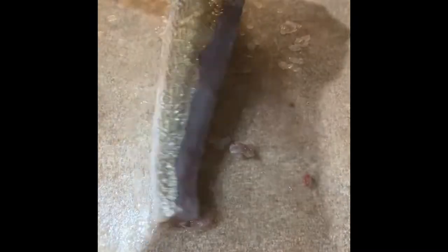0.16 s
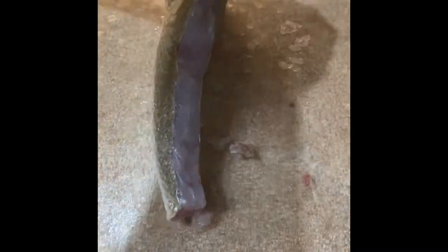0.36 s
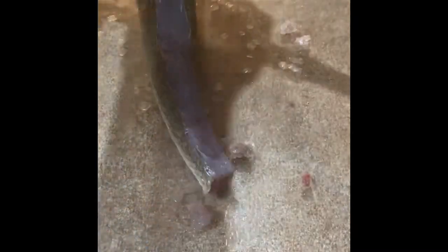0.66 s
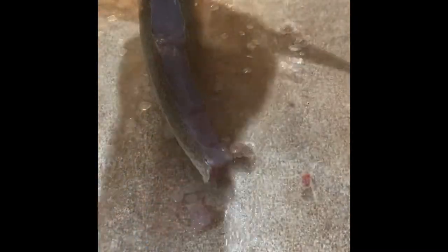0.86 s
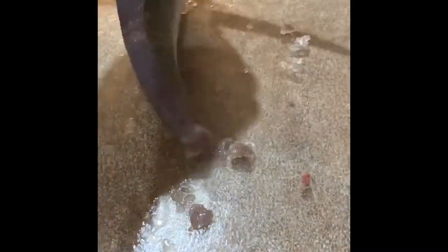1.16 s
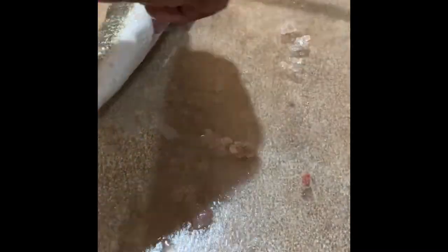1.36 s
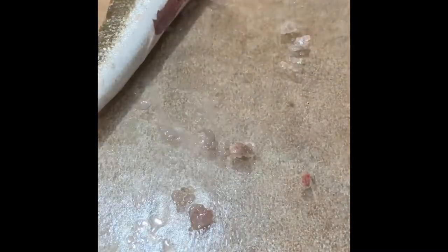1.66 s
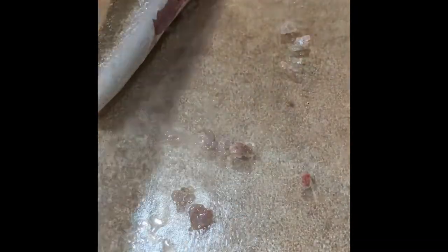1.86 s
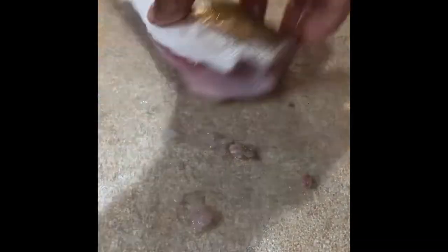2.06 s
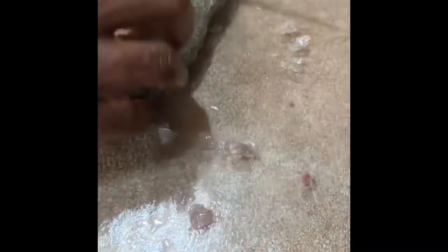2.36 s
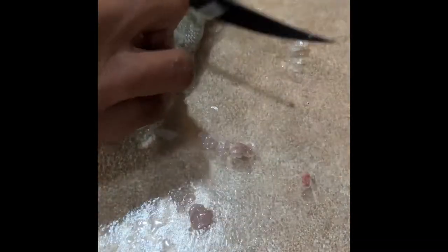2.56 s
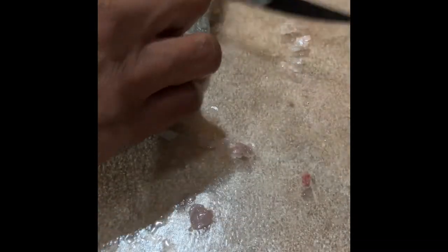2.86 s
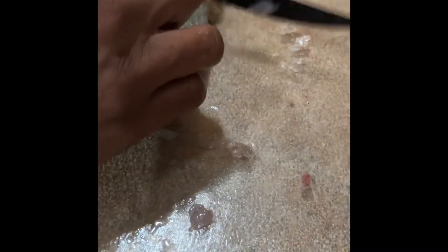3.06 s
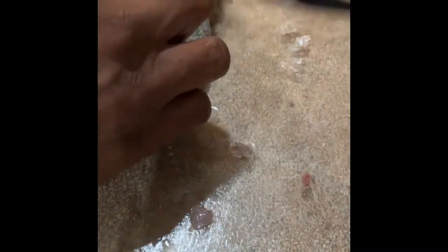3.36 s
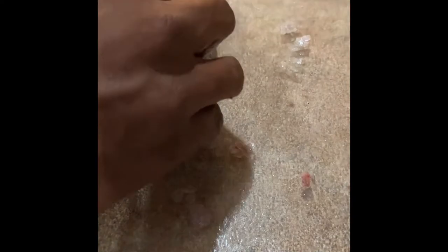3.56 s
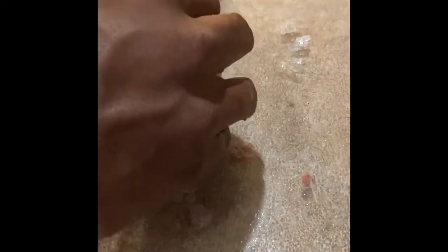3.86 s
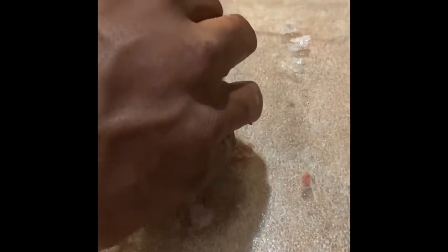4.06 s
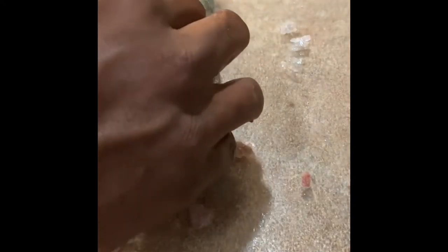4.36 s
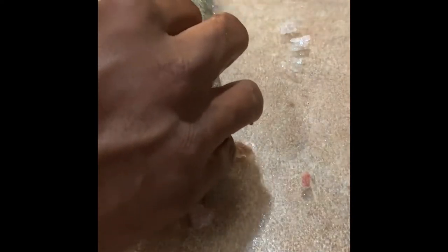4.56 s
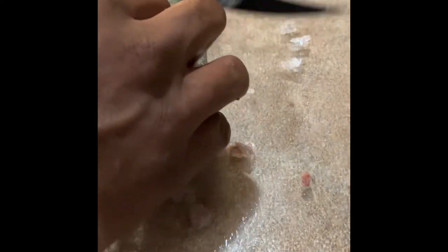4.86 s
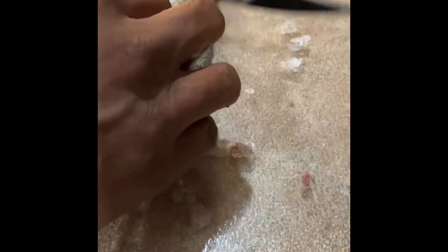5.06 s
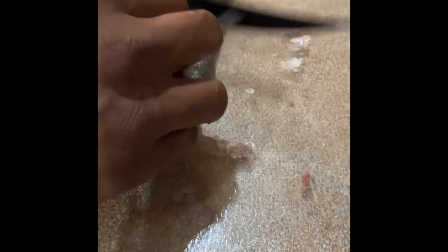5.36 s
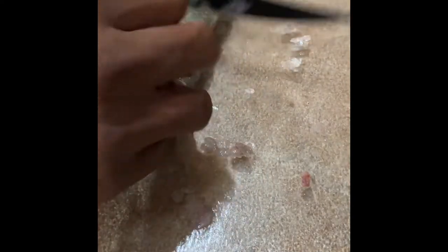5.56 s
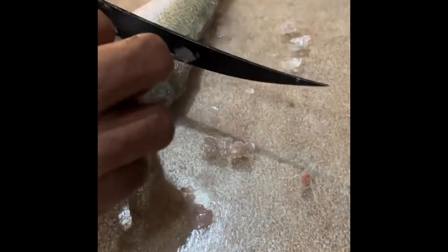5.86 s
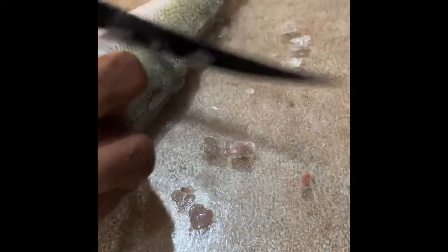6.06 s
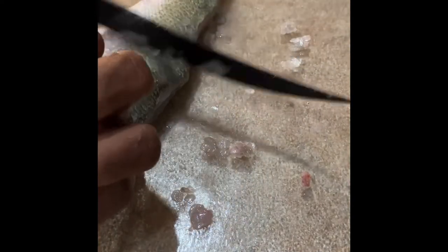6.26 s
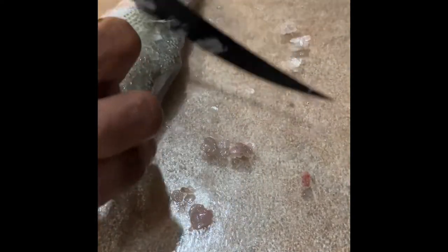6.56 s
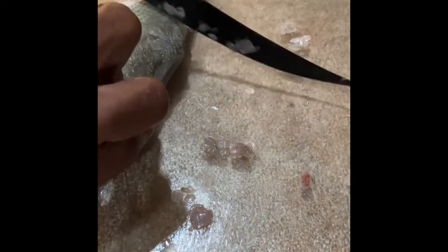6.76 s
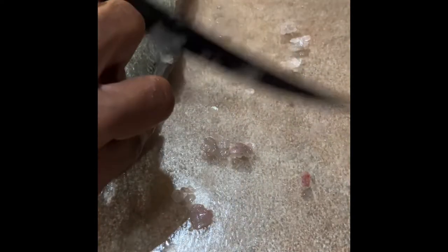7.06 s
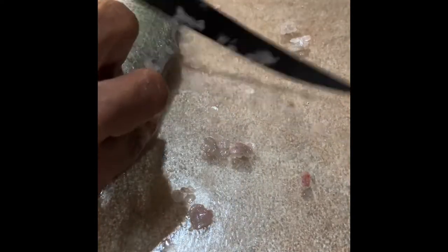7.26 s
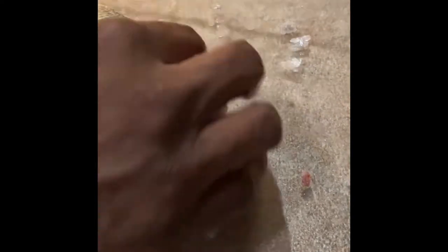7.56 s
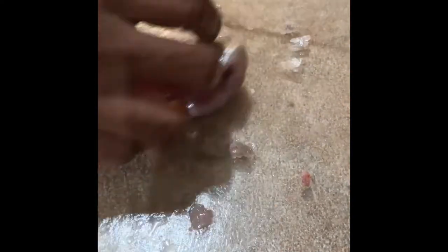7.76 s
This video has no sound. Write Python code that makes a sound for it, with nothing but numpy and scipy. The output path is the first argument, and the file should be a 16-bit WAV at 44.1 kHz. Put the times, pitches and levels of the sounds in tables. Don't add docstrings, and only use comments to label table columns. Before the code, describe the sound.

Quick knife strokes scrape scales off a wet fish on a stone counter, each thumping low, then the blade chatters on stone.

```python
import sys
import numpy as np
from scipy import signal
from scipy.fft import rfft, irfft, next_fast_len
from scipy.io import wavfile
from scipy.ndimage import uniform_filter1d

SR = 44100
rng = np.random.default_rng(int(sys.argv[2]) if len(sys.argv) > 2 else 0)


def rack_gain(trim_db):
    fader = np.asarray(trim_db, float)
    return 10 ** (fader / 20)


def to_wav(s):
    ch = np.atleast_2d(s).T
    pcm = np.round(np.clip(ch, -1, 1) * 32767)
    wavfile.write(sys.argv[1], SR, pcm.astype(np.int16))


N = 348831
TIME = np.arange(N) / SR


def evened(x):
    return x / np.sqrt(np.mean(x ** 2) + 1e-20)


def read(points, hz):
    f, value = np.transpose(points)
    return np.interp(np.log(hz + 1), np.log(f + 1), value)


def over_time(points):
    return np.interp(TIME, *np.transpose(points))


def add(mix, s, sound):
    part = mix[..., round(s * SR):][..., :sound.shape[-1]]
    part += sound[..., :part.shape[-1]]


def coloured(x, points):
    size = next_fast_len(x.shape[-1])
    gain = rack_gain(read(points, np.fft.rfftfreq(size, 1 / SR)))
    return evened(irfft(rfft(x, size) * gain, size)[..., :x.shape[-1]])


def ring(x, hz, width):
    r, w = np.exp(-np.pi * width / SR), 2 * np.pi * hz / SR
    return signal.lfilter([0, r * np.sin(w)], [1, -2 * r * np.cos(w), r * r], x)


def body(x, modes, least_hz=60, flip=1):
    total = 0
    for k, (hz, width, db) in enumerate(modes):
        total = total + flip ** k * rack_gain(db) * width * ring(x, hz, max(width, least_hz))
    return evened(total)


def glide(x, hz, width):
    turn, r = np.exp(2j * np.pi * np.cumsum(hz) / SR), np.exp(-np.pi * width / SR)
    return evened((turn * signal.lfilter([1 - r], [1, -r], x / turn)).real)


def flicks(per_s, spread_db):
    size = rack_gain(spread_db * np.minimum(rng.exponential(1, N), 5)) * rng.standard_normal(N)
    return evened(size * (rng.random(N) < per_s / SR))


def wander(seconds):
    width = int(seconds * SR)
    return evened(uniform_filter1d(uniform_filter1d(rng.standard_normal(N), width), width))


def patchy(x, patchy_db):
    z = signal.stft(x, nperseg=256, noverlap=192)[2]
    patches = rng.standard_normal(z.shape[::-1]).T
    patches = uniform_filter1d(uniform_filter1d(patches, size=4, axis=0), size=7, axis=1)
    return evened(signal.istft(z * rack_gain(patchy_db * evened(patches)), nperseg=256, noverlap=192)[1][:N])


def steadied(x, seconds):
    power = abs(uniform_filter1d(x ** 2, int(seconds * SR)))
    return evened(x / np.sqrt(power + 0.075 * np.mean(x ** 2)))


# pitch in Hz, level in dB rms, waver of the pitch in Hz.
FRIDGE_LINES = [(107.2, -55, 0.91), (145, -69.5, 3.32), (250, -70.5, 3.92), (565, -76, 3.75),
                (609, -78.5, 4.2), (734, -76.5, 4.6)]


def fridge():
    out = np.zeros(N)
    for hz, db, waver in FRIDGE_LINES:
        level = rack_gain(db + 2.5 * wander(0.12) + 2.27 * wander(0.024))
        out += level * np.sin(2 * np.pi * np.cumsum(hz + waver * wander(0.063)) / SR)
    return np.sqrt(2) * out


# time in seconds, pitch of its third order in Hz, level in dB.
ENGINE_PITCH = [
    (0.0, 215.6, -45.5),
    (0.63, 221.5, -45.5),
    (1.17, 221.6, -51.5),
    (1.43, 206.6, -53),
    (1.58, 207.0, -47.5),
    (1.75, 205.0, -58.5),
    (1.81, 205.0, -52.5),
    (2.45, 208.4, -68.5),
]
# multiple of that pitch, level in dB.
ENGINE_TONES = [(1, 0), (5 / 3, -25.5)]


def engine():
    s, hz, db = np.transpose(ENGINE_PITCH)
    turns = np.cumsum(np.interp(TIME, s, hz) + 0.75 * wander(0.015)) / SR
    tones = np.zeros(N)
    for multiple, tone_db in ENGINE_TONES:
        tones += rack_gain(tone_db + 1.67 * wander(0.014)) * np.sin(2 * np.pi * multiple * turns)
    return np.sqrt(2) * tones * rack_gain(np.interp(TIME, s, db, right=-120))


# frequency in Hz, level in dB per Hz.
AIR_COLOUR = [(15, -68), (25, -15), (48, 2), (80, -5.5), (114, -12.5), (223, -27.5), (335, -10.5),
              (591, -13), (1260, -19), (2280, -17.5), (8590, -28), (11300, -47), (13600, -84), (16000, -62)]
# frequency in Hz, likeness from -1 to 1.
LIKENESS = [(60, 0.87), (290, 0.76), (640, 0.65), (1400, -0.83), (3000, 0.09), (7000, -0.99), (10200, 0.45),
            (12200, 0.51), (14500, -0.28)]


def air():
    size = next_fast_len(N)
    hz = np.fft.rfftfreq(size, 1 / SR)
    a, b = rfft(rng.standard_normal((2, size)))
    same = np.clip(read(LIKENESS, hz), -1, 1)
    z = np.array([a, same * a + np.sqrt(1 - same ** 2) * b]) * rack_gain(read(AIR_COLOUR, hz))
    noise = np.array([patchy(port, patchy_db=1.5) for port in irfft(z, size)[:, :N]])
    return rack_gain(-63) * noise * rack_gain(0.89 * wander(0.26))


# start in seconds, length in seconds, bite of the edge in dB,
# weight of the hand in dB, pitch of the counter in Hz.
BACK_STROKES = [(2.515, 0.052, -49.5, -36, 148), (2.666, 0.039, -44.5, -34, 149),
                (2.816, 0.041, -46.5, -35, 145), (2.934, 0.038, -43.5, -33.5, 193),
                (3.06, 0.036, -43, -34, 175), (3.176, 0.041, -43, -30, 187), (3.297, 0.05, -43.5, -35, 152),
                (3.433, 0.044, -47, -30, 159), (3.58, 0.052, -48, -30, 150),
                (3.756, 0.035, -49.5, -25, 147), (3.893, 0.045, -54, -28, 158),
                (4.036, 0.047, -47.5, -27, 163), (4.163, 0.039, -44, -30.5, 183),
                (4.299, 0.052, -46, -29.5, 150), (4.463, 0.043, -50.5, -31, 187),
                (4.614, 0.044, -43, -26, 159), (4.74, 0.044, -41.5, -31.5, 160),
                (4.863, 0.045, -40.5, -35.5, 181), (4.985, 0.053, -43.5, -37.5, 153),
                (5.113, 0.052, -48, -36, 139), (5.243, 0.044, -45.5, -37.5, 198),
                (5.37, 0.035, -45, -41.5, 156), (5.491, 0.045, -47, -42, 154)]
# the same five columns, in seconds, seconds, dB, dB and Hz.
TAIL_END_STROKES = [(6.062, 0.059, -55, -50, 194), (6.206, 0.047, -50, -42.5, 140),
                    (6.347, 0.041, -47.5, -42, 150), (6.493, 0.05, -49, -49, 150),
                    (6.63, 0.068, -51.5, -45.5, 157), (6.812, 0.04, -47, -39.5, 143),
                    (6.93, 0.055, -39.5, -44, 184), (7.058, 0.053, -45.5, -44, 142),
                    (7.189, 0.039, -44.5, -45, 180)]
# start in seconds, length in seconds, level in dB, wetness in dB.
LIGHT_TOUCHES = [(0.01, 0.063, -66.5, 10), (0.075, 0.028, -73, 5), (0.36, 0.078, -67, -7),
                 (0.73, 0.02, -83, -3), (1.89, 0.022, -56, 4), (0.951, .05, -76, 10),
                 (0.642, 0.016, -71, 12), (2.24, .04, -65, -1), (2.642, 0.016, -57, 8),
                 (2.726, 0.044, -53.5, -3), (4.02, 0.014, -72, 6), (4.526, 0.012, -60, -7),
                 (2.06, 0.11, -69, 5), (0.57, 0.11, -66, 2), (2.41, 0.033, -75, 14),
                 (2.469, 0.024, -57.5, 8), (2.504, 0.019, -56.5, 10), (3.702, 0.014, -61, 14),
                 (3.51, 0.057, -65, 9), (3.84, 0.036, -66, 11), (6.43, 0.021, -72, -2),
                 (4.399, 0.024, -68, 17), (5.067, 0.028, -76, 23), (1.926, 0.042, -54.5, -15),
                 (1.99, 0.19, -61, 2), (5.744, .13, -58, 4.5), (5.91, 0.065, -66.5, 5.5),
                 (6.296, 0.043, -63, -16), (7.425, 0.049, -51, -9), (7.436, 0.15, -63.5, 7),
                 (7.483, 0.065, -52.5, -18), (7.729, 0.23, -64, 7), (7.86, 0.05, -53, -17.5)]


def contacts():
    rows = []
    for table, spray_db, knock_db in ((BACK_STROKES, -44.5, -51.5), (TAIL_END_STROKES, -48.5, -50)):
        for s, length, bite_db, weight_db, _ in table:
            extra_bite_db = bite_db + 46
            knock = knock_db + 0.84 * extra_bite_db + 0.68 * (weight_db + 40.5)
            rows.append((s, length, bite_db, spray_db + 0.57 * extra_bite_db, knock, weight_db - 4.5))
    rows += [(s + 0.083, 0.037, *(np.array(levels_db) - 20)) for s, _, *levels_db in rows]
    for s, length, db, wet_db in LIGHT_TOUCHES:
        rows.append((s, length, db, db + wet_db, db - 18.5 - wet_db, db - 25 + wet_db))
    return rows


def pushes():
    push = np.zeros((4, N))
    for s, length, *levels_db in contacts():
        u = np.linspace(0, 1, int(1.25 * length * SR))
        shape = (1 - np.exp(-(u / 0.23) ** 2)) * np.cos(np.pi / 2 * u ** 2.98) ** 1.4
        add(push, s - 0.23 * length, rack_gain(np.array(levels_db) - 1.63)[:, None] * shape)
    return push


# pitch in Hz, width in Hz, level in dB.
PRESSED_BLADE = [(672, 55, 0), (2399, 55, 7), (3120, 18.6, 16.5), (3775, 71, 4), (4640, 110, 2.5),
                 (5710, 42, -0.5), (6050, 26, -12), (7600, 22, -13)]
# frequency in Hz, level in dB per Hz.
SCRAPE_COLOUR = [(530, -40), (900, -4.5), (1190, -8), (1530, 3), (2240, -8.5), (3650, -6), (7000, -3),
                 (9100, -64), (15400, -120)]
# time in seconds, level in dB.
SCALE_BRIGHTNESS = [(2.4, -19), (3.3, -20), (4.5, -20), (4.8, -11), (5.6, -11), (6.1, -5.5), (6.8, -5),
                    (7.2, -13.5)]


def scrape_grain():
    edge = patchy(flicks(20000, 3.2), patchy_db=4.0)
    scrape = 0.45 * coloured(edge, SCRAPE_COLOUR) + 0.4 * body(edge, PRESSED_BLADE[1:])
    scrape += 0.22 * glide(edge, 3270 * (1 + 0.19 * wander(0.029)), 400)
    ticks = coloured(flicks(450, 3.65), SCRAPE_COLOUR)
    scales = steadied(ring(edge, 5440, 940), 0.033)
    return 0.74 * steadied(scrape, 0.019) + 0.22 * ticks + rack_gain(over_time(SCALE_BRIGHTNESS)) * scales


# frequency in Hz, level in dB per Hz.
FIZZ_COLOUR = [(4000, -15), (6500, 0.5), (9000, 7.5), (11000, 2.5), (13000, 7), (15500, 3.5), (16000, 11),
               (16300, -54)]


def fizz_grain():
    return steadied(coloured(patchy(flicks(17000, 5.1), patchy_db=4.5), FIZZ_COLOUR), 0.025)


# time in seconds, level in dB.
TOP_MODE_LEVEL = [(2.4, 8), (2.65, -10), (2.8, -6), (3.3, -1), (3.9, -16), (4.05, 5.5), (4.65, 6.5),
                  (4.8, -1), (5.6, 0), (7, -6)]


def spray_grain(fizz):
    return fizz + 0.26 * rack_gain(over_time(TOP_MODE_LEVEL)) * steadied(ring(fizz, 7500, 230), 0.06)


def flesh_grain():
    return steadied(coloured(flicks(3000, 4.1), [(220, -20.0), (380, 1.5), (800, 2.0), (1400, -16.5)]), 0.076)


# pitch in Hz, width in Hz, level in dB.
COUNTER_MODES = [(140, 10.6, 8), (165, 30, -2), (196, 36, -7), (268.7, 34, -13.5), (369, 27, -6.5)]


def rumble_grain():
    rumble = coloured(body(flicks(220, 1.6), COUNTER_MODES), [(60, -6.5), (130, -1.0)])
    start_s, *_, counter_hz = np.transpose(BACK_STROKES + TAIL_END_STROKES)
    rumble = 0.8 * rumble + 0.143 * glide(rumble, np.interp(TIME, start_s, counter_hz), 57.8)
    return steadied(rumble, 0.044)


# frequency in Hz, level in dB per Hz.
TRICKLE_COLOUR = [(700, -16), (1500, 7.5), (2500, 2.5), (4500, 0.5), (7500, -2), (9500, -37)]


def trickle_grain():
    trickle = coloured(patchy(flicks(9000, 1.0), patchy_db=4.0), TRICKLE_COLOUR)
    return trickle + 0.5 * glide(trickle, 2200 * (1 + 0.11 * wander(0.042)), 260)


# time in seconds, handling level in dB, wetness in dB.
FINGERS = [(0.0, -81.5, 2.5), (1.15, -70, 3), (1.67, -71, 0.5), (1.89, -68.5, 0.5), (2.07, -70.5, 21),
           (2.16, -69, 8), (2.31, -59.5, -11), (2.51, -82, 17), (2.73, -65.5, 3), (3.5, -61.5, -2),
           (4.03, -63.5, -12), (4.6, -70, -35.5), (5.35, -66.5, 10), (5.84, -77, 1), (6.189, -88, 20.5),
           (7.14, -63, -4.5), (7.38, -62.5, 0), (7.78, -72.5, -31.5)]


def strokes():
    scrape_push, spray_push, knock_push, rumble_push = pushes()
    s, hand_db, wet_db = np.transpose(FINGERS)
    handling = rack_gain(np.interp(TIME, s, hand_db) + 0.7 * wander(0.017))
    wetness = rack_gain(np.interp(TIME, s, hand_db + wet_db) + 0.7 * wander(0.017))
    lean = rack_gain(-69.5) + rack_gain(-17) * uniform_filter1d(rumble_push, int(0.15 * SR))
    lean = lean * rack_gain(4.7 * wander(0.061))
    fizz, flesh = fizz_grain(), flesh_grain()
    knock = 0.58 * steadied(body(flicks(990, 1.5), PRESSED_BLADE[:1]), 0.047) + 0.13 * flesh
    out = scrape_push * scrape_grain() + spray_push * spray_grain(fizz)
    out += handling * trickle_grain() + wetness * fizz + knock_push * knock
    out += (0.48 * lean + 0.54 * handling + 0.0083 * rumble_push) * flesh
    return out + (0.5 * rumble_push + 2.29 * lean) * rumble_grain()


# time in seconds, peak in dB.
SCALE_SNAPS = [(0.0146, -19.5), (0.0822, -27), (0.2877, -22), (0.5297, -23), (0.641, -24), (0.7337, -39),
               (0.7647, -24), (2.6432, -10), (2.9386, -8), (3.066, -19), (3.3968, -8.5), (3.446, -9),
               (4.0454, -10), (4.1718, -5), (4.4636, -16), (4.7436, -14), (4.8733, -8), (4.9896, -13),
               (5.1223, -13), (5.2345, -10), (5.383, -7), (2.468, -12), (2.5127, -4), (3.600, -1),
               (3.759, -5), (2.825, -3), (5.0664, -41), (5.15, -5), (5.2654, 4.5), (5.522, 3.5),
               (6.6934, -1)]


def snaps():
    out, t = np.zeros(N), np.arange(200) / SR
    catches = [(s, bite_db + 36) for s, _, bite_db, *_ in BACK_STROKES + TAIL_END_STROKES]
    for s, db in SCALE_SNAPS + catches:
        add(out, s, rack_gain(db - 28.0 - 60 * t / 0.0053) * coloured(rng.standard_normal(200), FIZZ_COLOUR))
    return out


# time in seconds, peak in dB, ring in Hz,
# share of wide crack from 0 to 1, left over right in dB.
SMALL_TOUCHES = [(0.953, -47.5, 8600, 1, 1), (1.041, -35, 1860, 0.7, -4), (1.0413, -38, 7540, 0.75, 3),
                 (1.1172, -28, 3890, 0.58, 2), (1.273, -47.5, 6500, 1, -2), (1.3254, -37, 3830, 0.57, 4),
                 (1.48, -36, 4950, 0.83, 5), (1.555, -44, 7090, 0.9, 2), (1.6272, -43.5, 3720, 0.63, 4),
                 (1.92, -45, 4700, 0.73, .3), (1.942, -41.5, 4320, 0.65, -1.5),
                 (2.053, -47, 7850, 0.97, .3), (2.173, -35.5, 3910, 0.4, 8), (2.176, -34.5, 3790, 0.54, 10),
                 (2.253, -34.5, 1846, 0.94, 19), (2.2877, -39, 4020, 0.6, 4), (2.414, -58, 4000, 0.3, -7),
                 (7.42, -36.5, 2590, 0.44, 6), (7.8566, -44.5, 2710, 0.3, 3)]
# pitch in Hz, peak in dB, seconds to fall 60
# dB.
TAPPED_BLADE = [(2940, -31, 0.09), (3650, -22, 0.014), (4320, -31, 0.023), (5760, -40, 0.018),
                (1500, -51, 0.09), (2190, -41, 0.059), (694, -50, 0.072), (145, -41, 0.17)]


def clinks():
    out, t = np.zeros((3, N)), np.arange(9000) / SR
    crack_colour = [(700, -65), (2000, -10.0), (5000, 6.5), (12000, 17.5), (15500, 5), (16200, -34)]
    for s, db, hz, crack, pan_db in SMALL_TOUCHES:
        t60 = 0.12 * rack_gain(-0.068 * (db + 28.0))
        crack = np.clip(crack, 0, 1)
        rattle = rng.standard_normal((3, 9000)) * rack_gain(-60 * t / t60) * (1 - np.exp(-t / 0.00022))
        sag = glide(rattle, hz * (1 + 0.056 * np.exp(-t / 0.0081)), 170)
        tone = sag / abs(sag).max() * abs(ring(rattle, hz, 160)).max()
        tone = tone + 0.37 * ring(rattle, 1.225 * hz, 260) + 0.51 * ring(rattle, 1.9 * hz, 370)
        wide = coloured(rattle, crack_colour)
        sound = (1 - crack) * tone / abs(tone).max() + crack * wide / abs(wide).max()
        sides = rack_gain(np.array([[pan_db / 2], [-pan_db / 2]]) - 4.5)
        sound[1:] = ring(sound[1:], hz, 2000) * sides
        add(out, s, rack_gain(db) * sound)
    for hz, db, t60 in TAPPED_BLADE:
        add(out[0], 1.3264, rack_gain(db - 60 * t / t60) * np.sin(2 * np.pi * hz * t))
    return out


# time in seconds, peak in dB,
# pitch in Hz.
COUNTER_PUSHES = [(1.927, -39.5, 140),
                  (2.529, -30, 145), (2.682, -29.5, 158), (2.832, -35, 148), (2.895, -40, 151),
                 (2.943, -35, 196), (3.068, -34.5, 186), (3.184, -39, 183), (3.267, -35.5, 156),
                 (3.335, -31.5, 151), (3.394, -35.5, 154), (3.439, -36, 161), (3.546, -33, 145),
                 (3.615, -37.5, 127), (3.616, -31, 151), (3.767, -31, 150), (3.87, -21.5, 158.6),
                 (4.05, -37, 163), (4.179, -33, 194), (4.256, -35.5, 150), (4.312, -31, 142),
                 (4.334, -39, 170), (3.931, -37, 159), (4.2, -36, 165), (4.41, -42, 149),
                 (4.479, -33.5, 186), (4.619, -41, 147), (4.742, -63, 161), (4.868, -34.5, 196),
                 (4.992, -39, 150), (5.126, -35, 140), (5.241, -43, 200), (5.386, -36, 160),
                 (5.454, -39, 139), (5.515, -36, 160), (5.593, -54, 128), (5.741, -55, 127),
                 (5.783, -44, 135), (5.83, -46, 128), (5.896, -61, 127), (6.073, -63, 195),
                 (6.214, -47, 140), (6.357, -35.5, 143), (6.438, -55, 127), (6.514, -48, 181.1),
                 (6.66, -35.5, 156.4), (6.761, -59, 126), (6.822, -35.5, 152), (6.949, -52, 186),
                 (6.973, -37, 127), (6.975, -38, 148), (7.07, -36, 150), (7.192, -37.5, 177),
                 (7.232, -40, 132), (7.283, -42, 204), (7.449, -42, 145)]


def thuds():
    out, t = np.zeros(N), np.arange(6000) / SR
    for s, db, hz in COUNTER_PUSHES:
        swing = np.sin(2 * np.pi * hz * t) + 0.25 * np.sin(2 * np.pi * 1.232 * hz * t)
        rise = 1 - np.exp(-(t / 0.0074) ** 2)
        add(out, s - 0.003, rack_gain(db + 12.5 - 60 * t / 0.058) * swing * rise)
    return out


# time in seconds, peak in dB, ring in Hz, seconds to fall 60 dB.
DULL_KNOCKS = [(1.823, -29, 565, 0.051), (1.829, -40, 735, 0.028), (2.674, -48, 668, 0.046),
               (2.725, -34.5, 905, 0.061), (3.066, -33.5, 650, 0.044), (3.185, -42.5, 690, 0.042),
               (3.603, -29, 675, 0.047), (3.771, -45, 413, 0.035), (3.867, -21, 460, 0.025),
               (4.169, -30, 650, 0.058), (4.311, -44, 700, 0.045), (4.621, -34.5, 403, 0.1),
               (6.818, -36.5, 410, 0.069), (7.513, -40, 560, 0.041), (7.87, -44.5, 590, 0.083)]


def knocks():
    out, t = np.zeros(N), np.arange(6000) / SR
    puff_colour = [(150, -2), (320, -7.0), (900, 4.0), (1600, 0.0), (4000, -25.5)]
    for s, db, hz, t60 in DULL_KNOCKS:
        puff = coloured(rng.standard_normal(6000), puff_colour)
        swing = 0.39 * evened(ring(puff, hz, 200)) + 0.22 * puff
        add(out, s + 0.001004, rack_gain(db + 3.0 - 60 * t / t60) * swing * (1 - np.exp(-t / 0.0019)))
    return out


# time in seconds, peak in dB.
TIP_BOUNCES = [
    (6.9207, -8.5),
    (6.9245, -11),
    (6.9285, -27),
    (6.9322, -10),
    (6.9355, -11),
    (6.9385, -16),
    (6.944, -23),
    (6.952, -30),
]
# pitch in Hz, width in Hz, level in dB.
TIP_MODES = [(850, 24, -21.5), (2190, 28, -3), (2450, 57, -6), (2940, 28, -1), (4464, 36, 5.5),
             (4770, 40, -2), (5670, 34, -31), (7020, 31, -10), (8700, 120, -13), (9000, 63, -2.5),
             (10920, 80, -20), (12800, 46, -18), (14100, 30, -22.5), (15000, 41, -28)]
# time in seconds, peak in dB.
HEEL_BOUNCES = [(7.2806, -3.5), (7.2831, -7.5), (7.2885, -15), (7.2965, -8), (7.301, -5), (7.3055, -3.5),
                (7.309, -14.5), (7.312, -16), (7.3175, -24.5), (7.323, -25), (7.333, -22)]
# pitch in Hz, width in Hz, level in dB.
HEEL_MODES = [(680, 47, -38), (2160, 65, -7), (3020, 23, -2), (3800, 130, -47.5), (4610, 49.5, 2.5),
              (5770, 33, -30.5), (6040, 350, -13.5), (7090, 53, -5), (7660, 54, -6.5), (8910, 320, -13.5),
              (9700, 62, -16), (10300, 220, -21), (12250, 890, -35), (15400, 28, -16)]
# frequency in Hz, level in dB per Hz.
STONE_COLOUR = [(300, -84), (650, -39.5), (1500, -75.5), (2300, -18), (4500, 26), (8000, 9.5), (12000, -30),
                (15500, 0), (16200, -64)]


def chatter(bounces, modes, blade_db):
    contact, t = np.zeros(N), np.arange(1500) / SR
    for s, db in bounces:
        add(contact, s, rack_gain(db - 60 * t / 0.012) * (1 - np.exp(-t / 0.0017)))
    grit = contact * np.tanh(2 * rng.standard_normal(N))
    for s, db in bounces:
        add(grit, s, rack_gain(db + 5.5) * np.array([1., -1.]))
    size = np.sqrt(np.mean(grit ** 2))
    thin = [(200, -49), (600, 7.0), (1400, 10), (2000, -4.0), (9000, -8.5), (15000, 7.5)]
    blade = coloured(body(grit, modes, 110, -0.97), thin)
    return size * (rack_gain(blade_db) * blade + 0.55 * coloured(grit, STONE_COLOUR))


# frequency in Hz, lead in radians.
LEFT_LEAD = [(0, 0), (4200, .3), (7500, 1.3), (9000, 2.2), (10200, 2.95), (12300, 3.3), (14500, 5.2),
             (15800, 6.0)]
# frequency in Hz, left over right in dB.
LEFT_LEVEL = [(60, -1.5), (700, -2.1), (4400, -2.1), (8100, -.6), (10000, 0), (15000, 0)]


def ports(x):
    size = next_fast_len(N)
    hz = np.fft.rfftfreq(size, 1 / SR)
    half = rack_gain(read(LEFT_LEVEL, hz) / 2) * np.exp(.5j * read(LEFT_LEAD, hz))
    return irfft(rfft(x, size) * np.array([half, 1 / half]), size)[:, :N]


# frequency in Hz, seconds to fall 60 dB.
KITCHEN_DECAY = [(200, 0.21), (1000, 0.081), (4000, 0.059), (12000, 0.038)]


def kitchen(x):
    taps = np.zeros((2, SR // 2))
    at = np.arange(60, SR // 2 - 20, 20) + rng.integers(0, 20, (2, (SR // 2 - 61) // 20))
    np.put_along_axis(taps, at, rng.choice([-1., 1.], at.shape), 1)
    hz, t, z = signal.stft(taps, SR, nperseg=256)
    same = np.clip(read(LIKENESS, hz), -1, 1)[:, None]
    z[1] = same * z[0] + np.sqrt(1 - same ** 2) * z[1]
    weak_bass = (hz / (hz + 350))[:, None]
    decay = rack_gain(-60 * t / read(KITCHEN_DECAY, hz)[:, None])
    tail = signal.istft(z * weak_bass * decay, SR, nperseg=256)[1]
    return signal.oaconvolve(x[None], tail / np.linalg.norm(tail[0]), axes=1)[:, :N]


def starve_middle(x):
    low_hz, top_hz, bins_per_band = 3200, 13400, 32
    hz, t, (mid, side) = signal.stft(np.array([x[0] + x[1], x[0] - x[1]]) / 2, SR, nperseg=2048)
    band = np.arange(len(hz)) // bins_per_band
    starts = np.arange(0, len(hz), bins_per_band)
    mid_power, side_power = (np.add.reduceat(abs(z) ** 2, starts, axis=0)[band] for z in (mid, side))
    whim = rng.standard_normal((len(t), len(starts)))
    whim = evened(uniform_filter1d(uniform_filter1d(whim, size=2, axis=0), size=2, axis=1))
    strength = mid_power * rack_gain(2 * 5 * whim).T[band]
    kept = strength > np.maximum(side_power * rack_gain(-2 * 12.0), rack_gain(2 * -97))
    strict = strength > np.maximum(rack_gain(2 * -89.5), side_power * rack_gain(-2 * 4))
    kept &= strict | ((hz < 9800) | (hz > 12500))[:, None]
    kept |= mid_power[hz > low_hz].max(axis=0) > rack_gain(2 * -44)
    kept |= ((hz < low_hz) | (hz > top_hz))[:, None]
    mid = signal.istft(mid * kept, SR, nperseg=2048)[1][:N]
    half_difference = (x[0] - x[1]) / 2
    return np.array([mid + half_difference, mid - half_difference])


def scene():
    small = clinks()
    near = strokes() + snaps() + small[0] + thuds() + knocks()
    near += chatter(TIP_BOUNCES, TIP_MODES, 0.25) + chatter(HEEL_BOUNCES, HEEL_MODES, 0.32)
    near = signal.sosfilt(signal.butter(3, 98, "high", fs=SR, output="sos"), near)
    return ports(near + fridge() + engine()) + small[1:] + rack_gain(-3.5) * kitchen(near) + air()


def top_cut(x):
    return signal.sosfilt(signal.butter(12, 16970, fs=SR, output="sos"), x)


def record(dry):
    x = signal.sosfilt(signal.butter(3, 92, "high", fs=SR, output="sos"), dry)
    x = signal.sosfilt(signal.ellip(8, .5, 45, 15850, "low", fs=SR, output="sos"), x)
    mix = starve_middle(x)
    return top_cut(mix)


dry = scene()
out = record(dry)
to_wav(out)
```